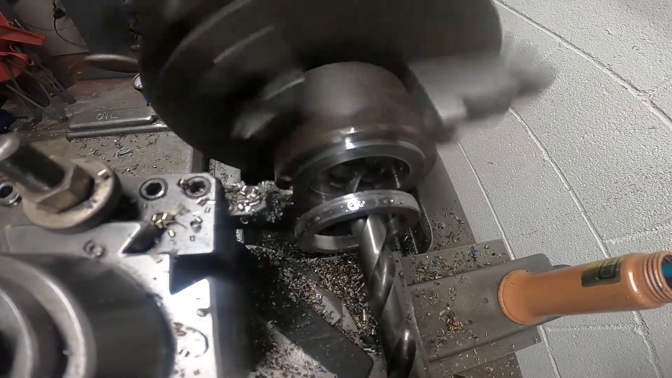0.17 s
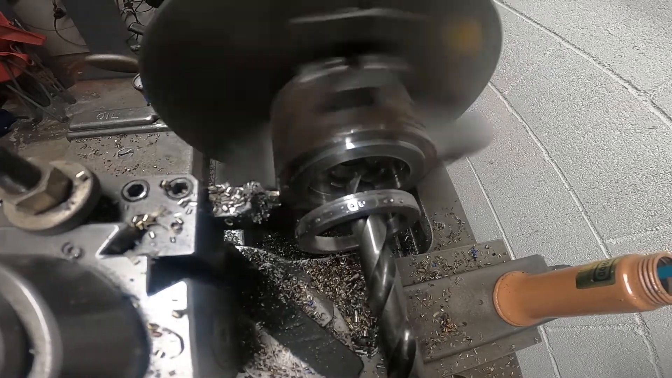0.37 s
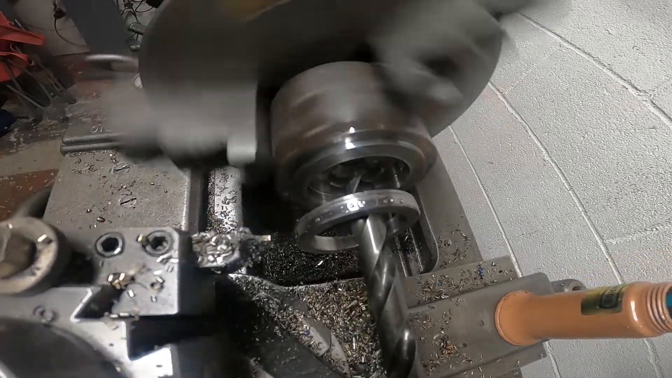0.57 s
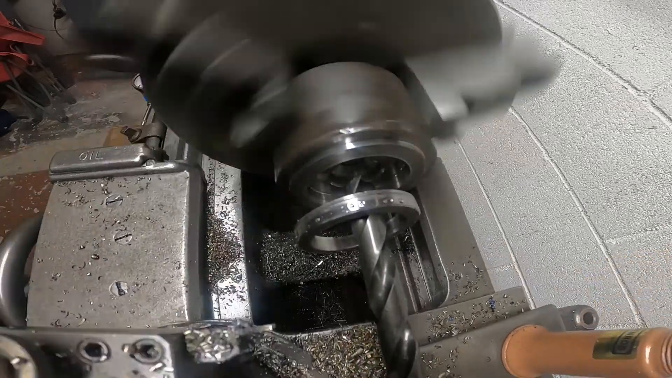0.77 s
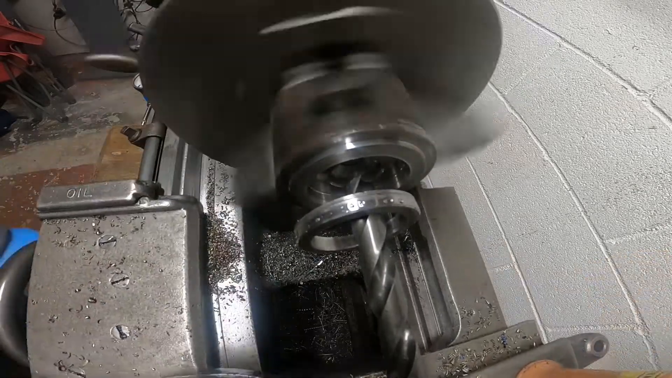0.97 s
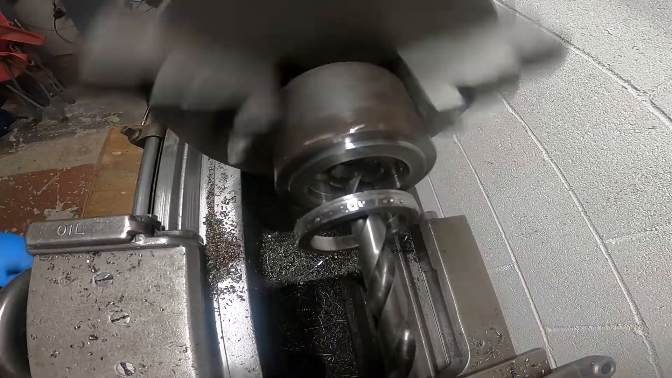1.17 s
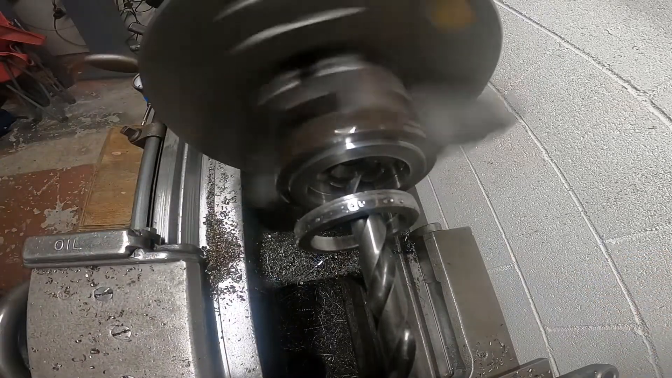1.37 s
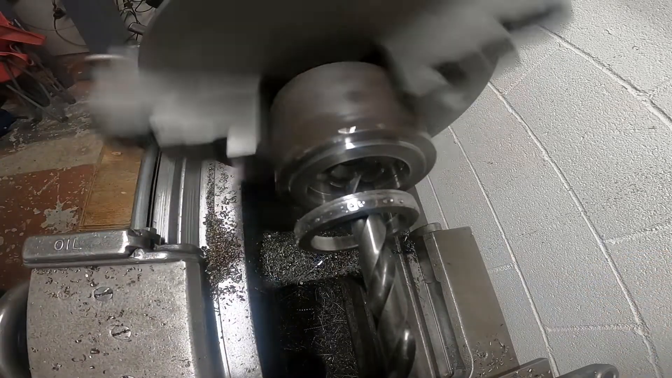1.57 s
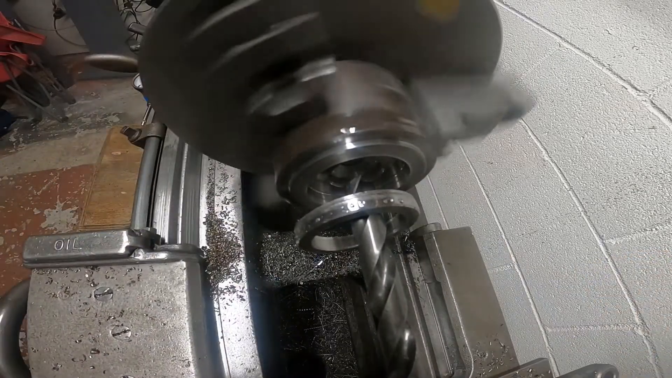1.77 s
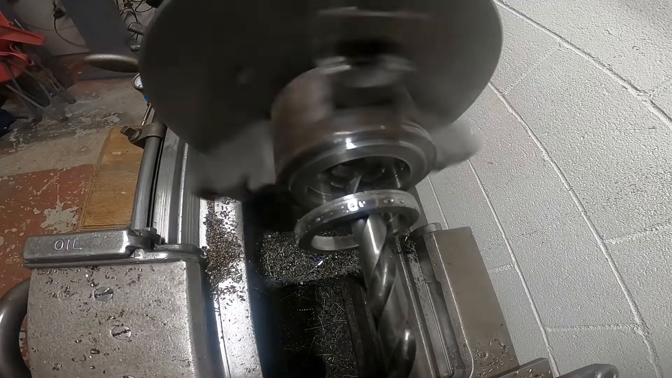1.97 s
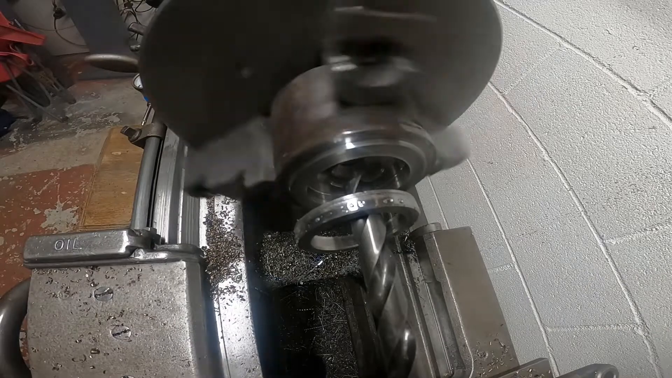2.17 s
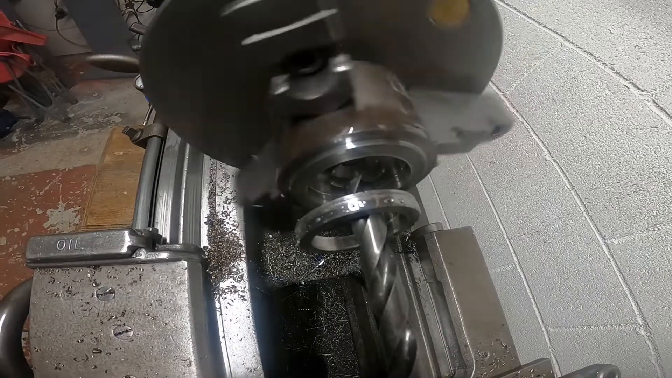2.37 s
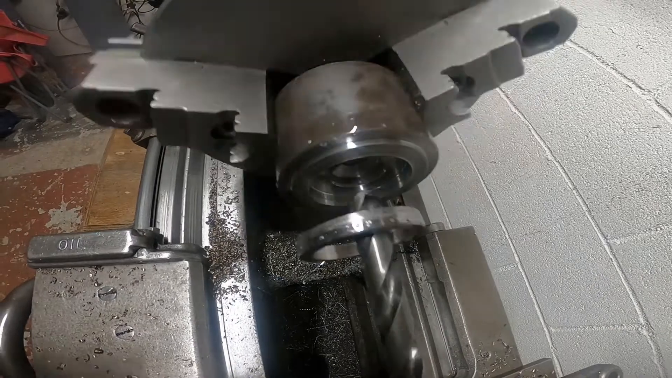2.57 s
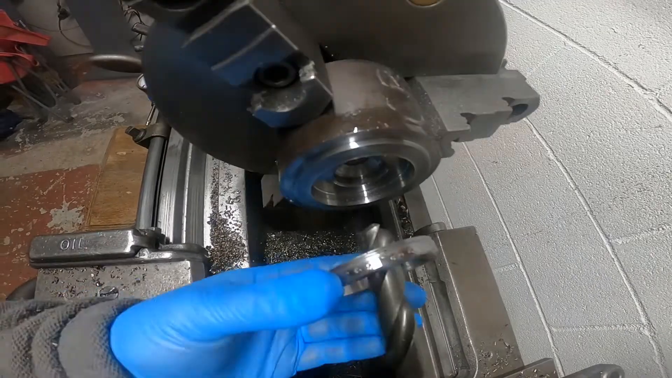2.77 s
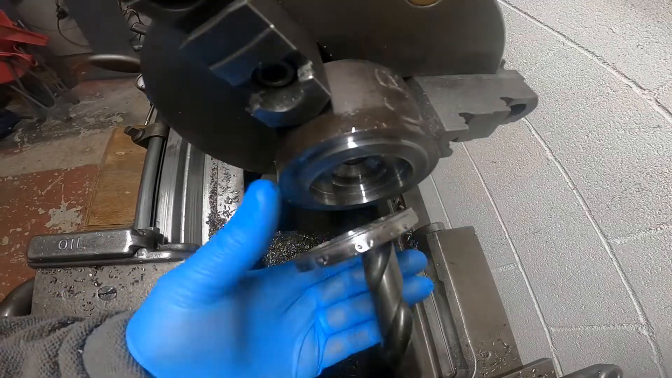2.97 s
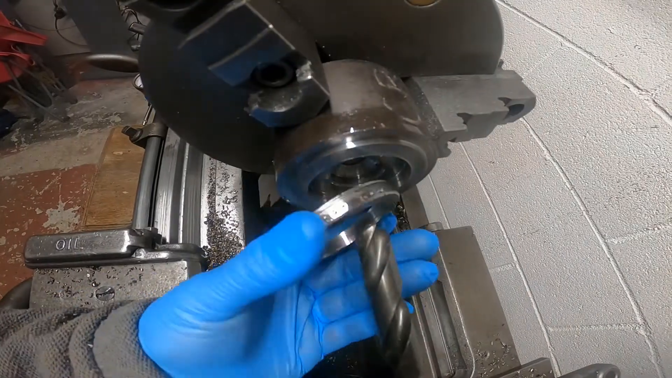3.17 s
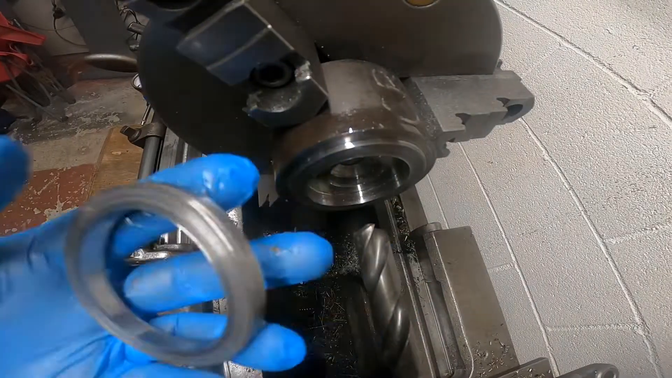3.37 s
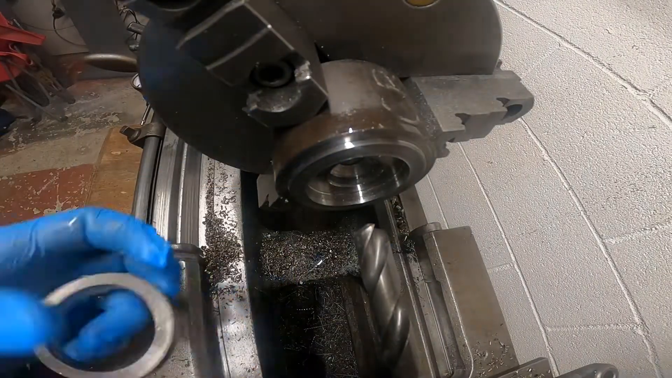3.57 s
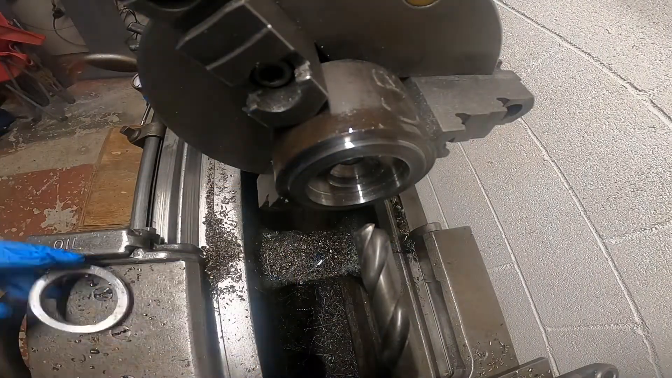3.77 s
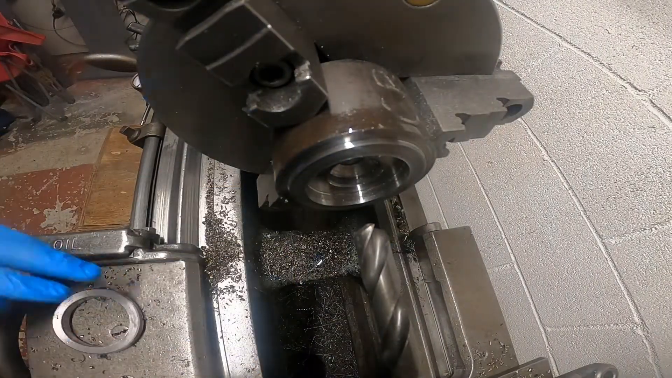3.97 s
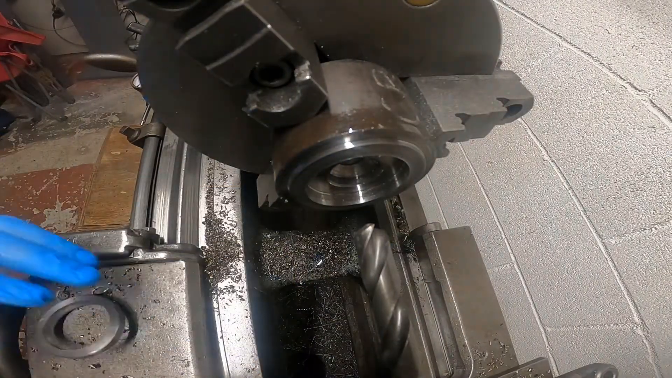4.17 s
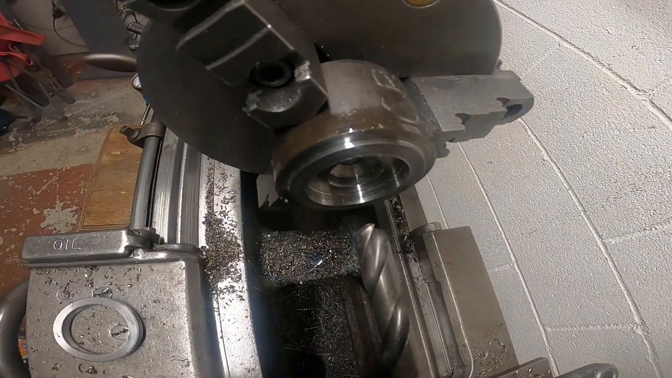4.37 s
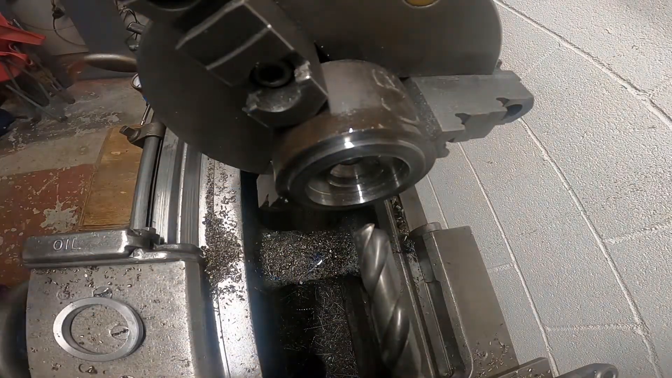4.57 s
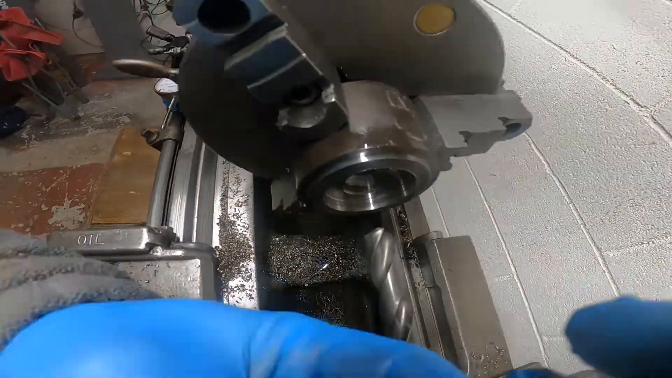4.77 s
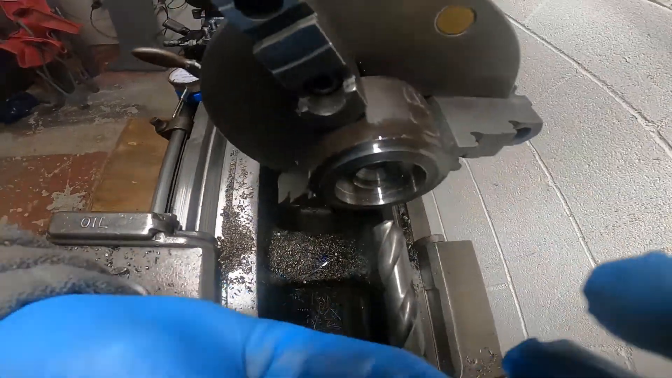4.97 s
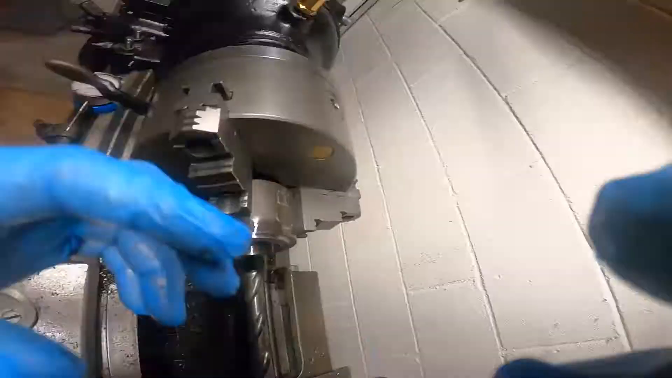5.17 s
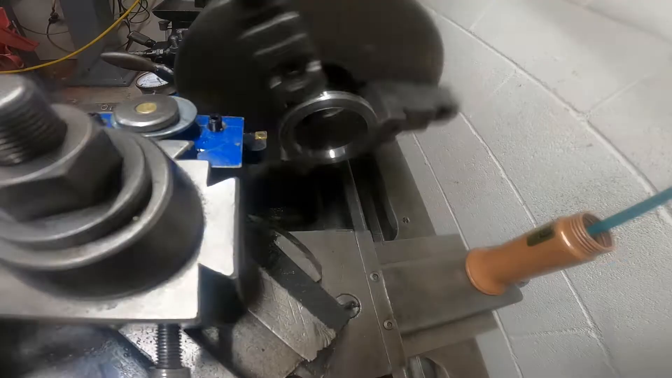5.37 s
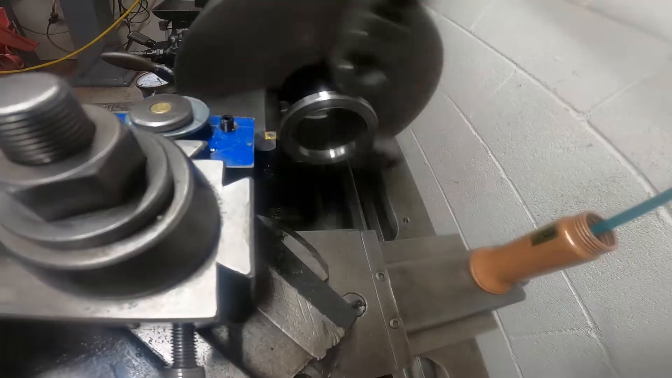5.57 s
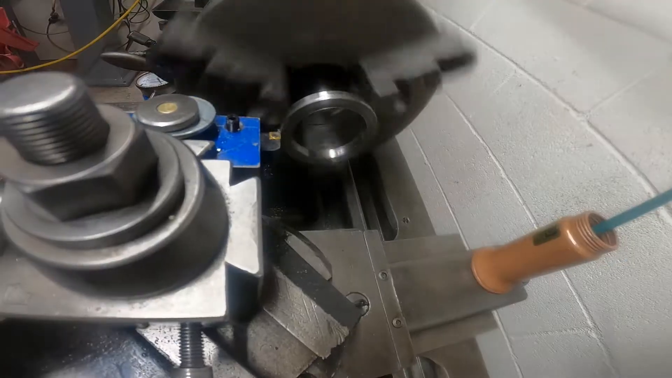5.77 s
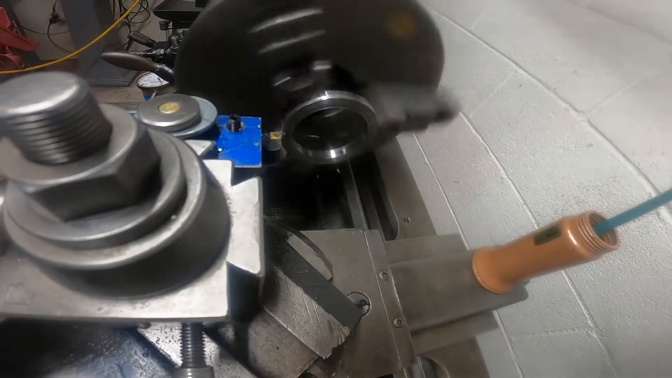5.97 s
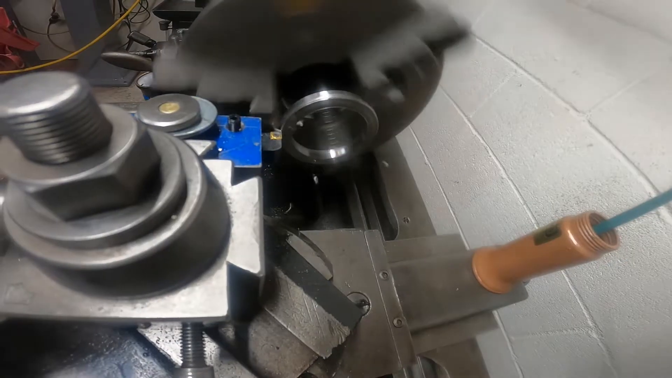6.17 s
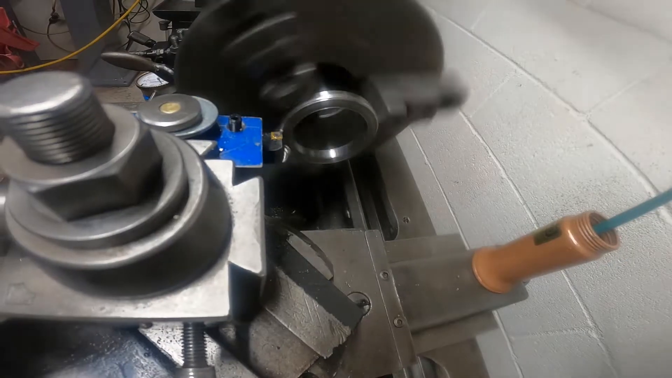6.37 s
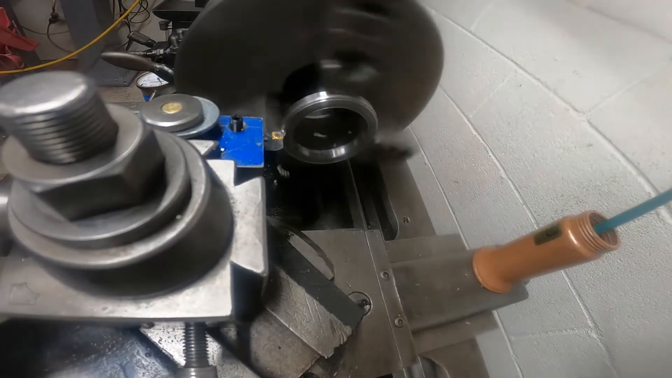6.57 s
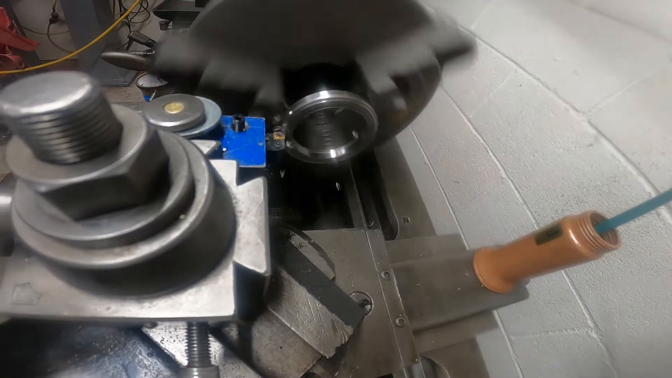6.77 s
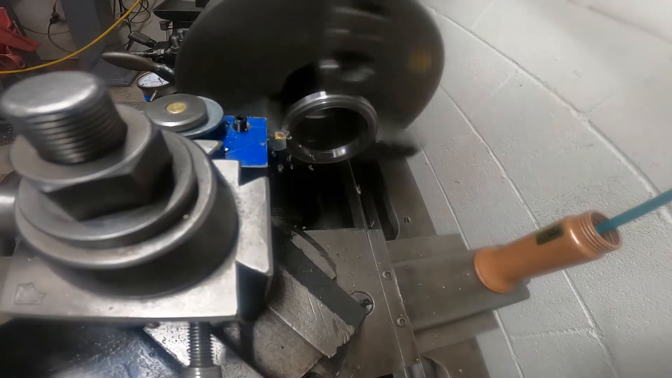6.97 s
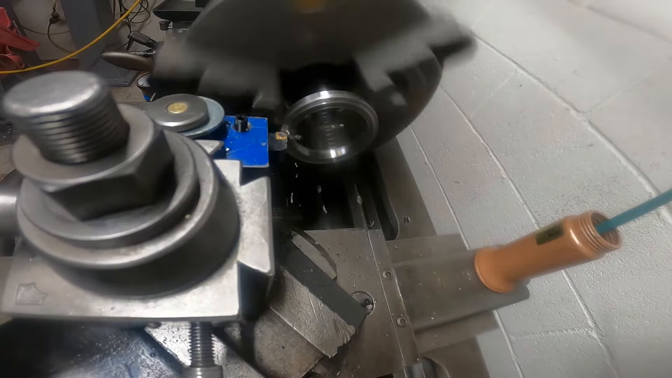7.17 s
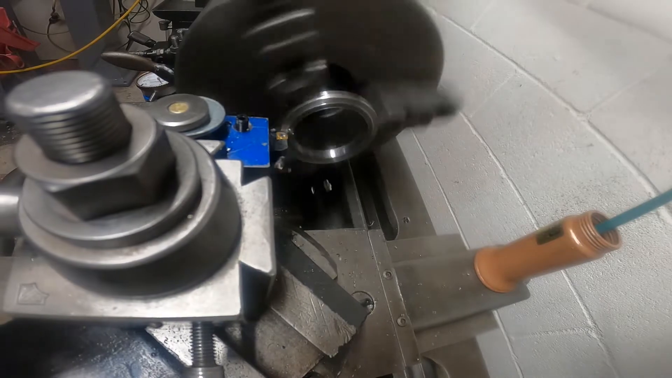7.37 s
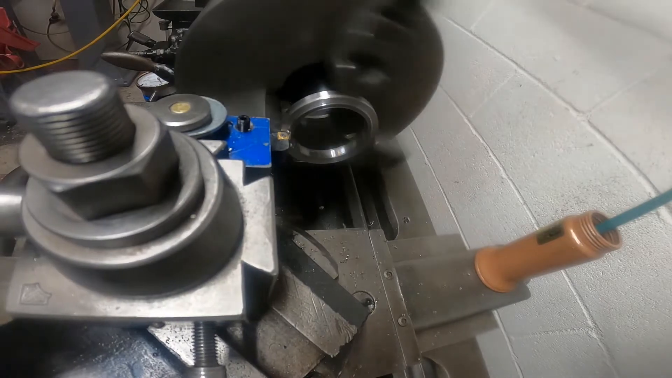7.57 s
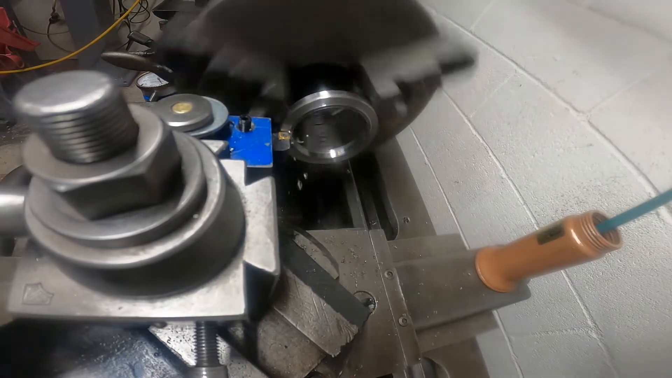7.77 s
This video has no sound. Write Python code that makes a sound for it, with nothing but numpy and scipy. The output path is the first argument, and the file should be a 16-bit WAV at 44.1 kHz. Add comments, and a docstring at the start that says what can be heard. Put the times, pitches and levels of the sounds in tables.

```python
"""A metal lathe stops and starts again

A geared lathe whines, slows and stops; one motor speed sets the pitch and loudness of all its gears.
A gloved hand lifts a cut-off steel ring from the drill and lays it, clinking, on the sliding carriage.
A camera is grabbed and moved, then the lathe speeds up and a tool hisses on the spinning steel.
It is all heard from close by in a small workshop."""
import sys
import numpy as np
from scipy import signal
from scipy.fft import rfft, irfft, next_fast_len
from scipy.io import wavfile
from scipy.ndimage import map_coordinates

SR = 44100
rng = np.random.default_rng(int(sys.argv[2]) if len(sys.argv) > 2 else 0)


def to_wav(sig):
    """Store sig (one row per channel, or 1-D mono) as 16-bit WAV at the path in sys.argv[1].

    Samples outside -1..1 are clipped; the rate is SR.
    """
    pcm = np.clip(np.atleast_2d(sig), -1, 1) * 32767
    pcm = np.round(pcm).astype(np.int16)
    wavfile.write(sys.argv[1], SR, pcm.T)  # frames by channels


N = 344421
T = np.arange(N) / SR

TEETH, FULL_HZ = 29, 1771  # the motor's small gear: its teeth, and tooth hits a second at full speed
BRAKE_S, HALT_S, RESTART_S, CUT_S = 1.425, 2.82, 5.425, 5.72
# how alike left and right sound: (frequency [Hz], likeness [0 to 1])
LIKENESS = [(60, 0.31), (300, 1), (650, 0.97), (1200, 1), (2500, 0.96), (5000, 0.76), (9000, 0.58),
            (15000, 0.52)]


def lathe(whine, full_hz, drone_db, rumble_db, clatter_db, sizzle_db, hum_db, whine_db, throb, slack):
    """Teeth rattle in the iron housing, harder once per motor turn, as shafts hum; all grow with speed."""
    # motor and gear tones at full speed: (pitch [Hz], level [dB])
    gear_hum = [(64, -57), (140, -56), (159, -55.5), (238, -58.5), (317.6, -46.5), (379, -33),
                (397.5, -35.5), (457.6, -44), (478, -39.5), (635.2, -39.5)]
    tooth_hz = tooth_rate()
    speed, motor = tooth_hz / FULL_HZ, cycles(tooth_hz / TEETH)
    beat_db = throb * (np.cos(motor) + 0.33 * np.cos(2 * motor))
    beat = unit(amp(beat_db + 0.44 * wobble(300) + 0.7 * wobble(40)))
    weight = speed ** 2.15
    rumble = amp(rumble_db + 1.1 * wobble(45)) * weight * housing_noise(240, 552)
    drone = amp(drone_db) * weight * speed ** 2 * housing_noise(20, 250)
    clatter = amp(clatter_db) * level_off(speed, knee=slack * 0.48, power=1.28) * housing_noise(603, 2280)
    sizzle = amp(sizzle_db) * level_off(speed, knee=slack * 0.63, power=1.76) * housing_noise(2420, 23000)
    hum = amp(hum_db) * weight * shaft_tones(gear_hum, speed, flutter_db=1, jitter=0.33)
    sing = amp(whine_db) * shaft_tones(whine, tooth_hz / full_hz, flutter_db=3, jitter=0.49)
    return rumble + drone + beat * (clatter + sizzle) + hum + sing


def tooth_rate():
    """Tooth hits a second: full speed, down to rest, up again, then a slight sag under the cut."""
    slowing = FULL_HZ * np.clip((HALT_S - T) / (HALT_S - BRAKE_S), 1e-3, 1) ** 1.05
    rising = 755 + 1412 * (T - RESTART_S)
    loaded = FULL_HZ - 5.8 * np.clip((T - 6.2) / .3, 0, 1)
    return np.where(T < RESTART_S, slowing, np.minimum(rising, loaded))


def housing(hz):
    """How strongly the iron housing gives off each frequency, in dB."""
    # broad shape of the gear noise: (frequency [Hz], level [dB])
    gear_colour = [(30, -30), (60, -17), (100, -21), (220, -11.5), (330, -0.5), (600, 1.2), (1000, -8.5),
                   (2000, 3), (3000, -0.5), (5000, 0.05), (8000, -1.5), (12000, -6.5), (15500, -9)]
    # where the housing rings: (frequency [Hz], width [Hz], boost [dB])
    resonances = [(135, 5, 1), (149.6, 16, 12), (371, 45, 11.5), (389, 13.6, 4.5), (468, 23, 9),
                  (675.5, 23, 8.5), (827, 230, 14), (1082, 113, 9.5), (1230, 193, 14), (1566, 51, 8),
                  (1625, 380, 4), (2156, 65, 5), (2780, 14, 8.5), (3610, 220, 7.5), (4490, 1360, 4),
                  (5450, 380, 3), (6380, 230, 2), (7040, 64, 10), (10691, 360, 2), (12016, 666, 1.5),
                  (12630, 500, 5.5), (14122, 213, 6)]
    return along(gear_colour, hz) + sum(peak(hz, *row) for row in resonances)


def housing_noise(low_hz, high_hz):
    """Noise from the housing between two frequencies."""
    cut_db = lambda hz: 10 * np.log10((1 + (low_hz / (hz + 1)) ** 10) * (1 + (hz / high_hz) ** 10))
    return noise(lambda hz: housing(hz) - cut_db(hz))


def shaft_tones(tones, speed, flutter_db, jitter):
    """Shaft tones glide with the speed, fade as it drops and swell where the housing rings."""
    out, grid_hz = np.zeros((2, N)), np.arange(SR // 2)
    housing_db, angle = housing(grid_hz), cycles(speed)
    for hz, db in tones:
        boost_db = np.interp(hz * speed, grid_hz, housing_db) - housing_db[int(hz)]
        level = amp(db + 0.87 * boost_db + flutter_db * wobble(45)) * speed ** 2
        drift = jitter * (wobble(4) + .5 * wobble(40))
        out += level * stereo_tone(hz * angle + drift + rng.uniform(0, 2 * np.pi), hz)
    return out


def motor_gear(overtones, rough, backlash, glide_db, glide_power, falloff_db):
    """The motor's gear whines; below full speed it sweeps the gearbox's resonances and its teeth bounce."""
    # the whine shifts from odd to even overtones: (time [s], half width [s], size [dB])
    swells = [(1.32, .25, 8.5), (6.3, .3, 6.5)]
    # gearbox resonances: (frequency [Hz], level [dB])
    gearbox = [(500, -7), (950, -8), (1250, 0), (1400, -4), (1640, 6), (1950, 0), (2700, 3), (3100, -1),
               (3600, 0.5), (5400, 2), (6600, 1), (8500, -24.5)]
    tooth_hz = tooth_rate()
    speed, phase, motor = tooth_hz / FULL_HZ, cycles(tooth_hz), cycles(tooth_hz / TEETH)
    gliding = np.clip(11 * (1 - speed), 0, 1)  # 0 at full speed, 1 once clearly slower
    loose = rough + backlash * gliding
    swell_db = sum(db * bump(s, width) for s, width, db in swells)
    out = np.zeros((2, N))
    for k, (full_db, share) in enumerate(overtones, 1):
        slow_db = glide_db + along(gearbox, k * tooth_hz) + glide_power * 20 * np.log10(speed)
        slow_db -= falloff_db * (k - 2.2) ** 2  # favours the overtones near the second
        db = (1 - gliding) * (full_db + share * swell_db) + gliding * slow_db
        sway = (0.11 * k + .55 * gliding) * np.sin(motor + rng.uniform(0, 2 * np.pi))  # once per turn
        shake = loose * (wobble(50) + 0.54 * wobble(200)) + .3 * wobble(4.6)
        out += amp(db + 6.2 * loose * wobble(110)) * stereo_tone(k * phase + sway + shake, k * FULL_HZ)
    return out


def two_runs():
    """The lathe runs until it halts, then starts again with a slightly different whine."""
    # shaft tones of each run at full speed: (pitch [Hz], level [dB])
    first_whine = [(1244, -45.5), (1273, -42), (1523, -40.5), (1588, -44.5), (1712, -43), (2374, -46.5),
                   (3128, -42.5), (3295, -49), (3666, -40), (3908, -44), (4393, -43), (4689, -41.5),
                   (5405, -45.5), (5491, -48.5), (8280, -57), (8856, -54)]
    second_whine = [(877.5, -45.5), (1523, -43.5), (1701, -50), (2126, -49), (3117, -46), (3957, -49.5),
                    (4377, -39), (5173, -50), (5356, -40), (5475, -45), (8834, -61.5)]
    # motor gear at 1 to 6 times the tooth rate: (first run [dB], second run [dB], swell share [factor])
    overtones = [(-31.5, -39, -.3), (-34, -38, 1), (-31, -24.5, -0.43), (-45.5, -34, .6), (-64, -57, 0),
                 (-75, -69, 0)]
    first_db, second_db, share = np.transpose(overtones)
    first = lathe(first_whine, full_hz=1771, drone_db=-47.5, rumble_db=-32.5, clatter_db=-29.5,
                  sizzle_db=-24, hum_db=2, whine_db=4.5, throb=0.89, slack=1.08)
    first += motor_gear(zip(first_db, share), rough=.15, backlash=.42,
                        glide_db=-29.6, glide_power=1.6, falloff_db=.6)
    second = lathe(second_whine, full_hz=1766, drone_db=-49, rumble_db=-32, clatter_db=-29.5,
                   sizzle_db=-26, hum_db=2, whine_db=4, throb=0.53, slack=0.74)
    second += motor_gear(zip(second_db, share), rough=.24, backlash=.6,
                         glide_db=-31.3, glide_power=.55, falloff_db=.7)
    return first * (T < HALT_S) + second * np.clip((T - RESTART_S) / 0.037, 0, 1) ** 2


def cutting():
    """Steel tears off in a hiss that swells as each of the three jaws gripping it comes round."""
    # the hiss: (frequency [Hz], level [dB])
    hiss_colour = [(3000, -26), (6000, -7), (7900, -3), (9500, -2), (10700, 3), (13000, -1.5),
                   (15700, -3.5)]
    tooth_hz, hits_per_turn = tooth_rate(), 254
    jaws, motor = 3 * cycles(tooth_hz / hits_per_turn), cycles(tooth_hz / TEETH)
    swell_db = 1.1 * np.cos(jaws) + 1.3 * np.cos(motor) + 1.5 * wobble(900)
    return cut_gain() * unit(amp(swell_db)) * noise(lambda hz: along(hiss_colour, hz))


def cut_gain():
    """The tool bites, then the cut deepens to a steady strength."""
    shallow_db = 7 * np.exp(-np.maximum(T - CUT_S, 0) / 0.45)
    bite_db = 6.5 * bump(5.82, width_s=0.032)
    return np.clip((T - CUT_S) / 0.15, 0, 1) * amp(-23.5 - shallow_db + bite_db)


def chips():
    """Now and then a chip curls off the tool with a brief high chirp."""
    out, t = np.zeros((2, N)), np.arange(SR // 50) / SR
    for when, pitch, size in rng.random((45, 3)):
        s, hz = CUT_S + (T[-1] - CUT_S) * when, 7200 + 6000 * pitch ** 2
        chirp = np.sin(2 * np.pi * hz * t * (1 - t) + rng.normal(0, .5, len(t))) * np.hanning(len(t))
        add(out, s, amp(9 * size - 13) * chirp)
    return cut_gain() * out


def steel_ring():
    """The ring clinks against drill and carriage; the glove damps it quickly."""
    # (time [s], level [dB], fade time [s], brightness [dB per octave], left minus right [dB])
    clinks = [(2.502, -16.5, .05, -6, 1), (2.984, -25.5, 0.045, -.5, 2), (3.139, -15.5, 0.021, 7, 1),
              (3.529, -29, .08, 5, 6), (3.652, -33, .012, 5, 2), (3.677, -22.5, 0.024, -2.5, 1),
              (3.682, -16, 0.065, -1.5, 1.5), (3.791, -7, 0.02, 3, 0), (3.803, -21, 0.038, -0.5, 1),
              (3.82, -27, .05, 0, 2), (3.879, -36, .06, -3.5, 0), (4.021, -33.5, .04, 3.5, 5),
              (4.21, -29, 0.037, 0, 0), (4.218, -18, 0.028, 1.5, 0), (4.253, -30.5, .04, -2, 0),
              (4.272, -24.5, .05, 0, 1.5), (4.529, -26, 0.091, 1, 4), (4.62, -29, 0.076, -1.5, 3.5)]
    # the ring's own notes: (pitch [Hz], level [dB], fade time [s])
    steel_notes = [(804, -7.5, 0.22), (1155, -11, 0.099), (2615, -10, 0.13), (3750, -20, 0.063),
                   (4730, -3, 0.18), (5600, -5, 0.14), (6800, -14, 0.055), (8300, -13, 0.045),
                   (9980, -12, 0.045), (11070, 2, 0.093), (13100, -10, 0.036)]
    # the crack of contact: (frequency [Hz], level [dB])
    crack_colour = [(100, -19), (400, -32), (800, -6), (1600, -19.5), (2700, -6), (4800, -0.5), (12000, -2),
                    (16000, -2)]
    out, t = np.zeros((2, N)), np.arange(SR // 4) / SR
    for s, db, fade_s, slope, pan in clinks:
        fade = amp(-60 * t / fade_s) + 0.64 * amp(-60 * t / 0.0041)
        crack = noise(tilted(crack_colour, slope), size=len(t)) * fade
        # a harder contact rings brighter
        notes = [(hz, level + .5 * slope * np.log2(hz / 8000), t60) for hz, level, t60 in steel_notes]
        add(out, s, amp(db - 11) * (crack + 0.09 * ringing(notes, t)), pan)
    return out


def camera():
    """Fingers knock a camera's body, its mount snaps, and the grip rumbles, mostly on the left."""
    # (time [s], thump [dB], snap [dB], brightness [dB per octave], thump left minus right [dB])
    knocks = [(4.738, -26, -54, -4, 10), (4.752, -36, -51, -4, 20), (4.803, -22, -37, -5, 3),
              (4.873, -23, -32.5, -4, 3), (4.889, -22.5, -38, -4, -2), (4.936, -13.5, -8.5, .5, 5),
              (4.955, -25, -48, -4, -2), (4.991, -22, -26, -3, -3), (5.066, -25, -47, -5, 2),
              (5.079, -10, -10, -2.5, 5.5), (5.139, -19, -32, -3, 6), (5.17, -15, -7.5, -3, 2),
              (5.278, -23.5, -49, -9, -7)]
    # the body's own notes: (pitch [Hz], level [dB], fade time [s])
    body_notes = [(118, -26, 0.12), (188, -1, 0.053), (308, 4.5, 0.023), (587, -5, 0.023),
                  (1160, -8, 0.013), (3380, -22, 0.019)]
    # the mount's snap and the grip's rumble: (frequency [Hz], level [dB])
    snap_colour = [(100, -7), (600, -1.5), (1200, -8.5), (1900, -11.5), (3000, -7), (7000, -12.5),
                   (15000, -14)]
    grip_colour = [(20, -22), (35, -9), (55, 1), (130, 1.5), (200, -2), (500, -19), (1500, -27),
                   (6000, -63)]
    out, t = np.zeros((2, N)), np.arange(SR // 5) / SR
    snap_shape = amp(-60 * t / 0.014) * (1 - np.exp(-t / 0.00051))
    for s, thump_db, snap_db, slope, pan in knocks:
        snap = noise(tilted(snap_colour, slope), size=len(t)) * snap_shape
        left = ringing(body_notes, t)  # each side is shaken its own way
        right = ringing(body_notes, t) * (1 - np.exp(-t / 0.0016))
        add(out, s, amp(thump_db - 5.5) * np.array([left, right]), pan)
        add(out, s, amp(snap_db) * snap)
    rumble = filtered(rng.standard_normal((2, N)), lambda hz: amp(along(grip_colour, hz)))
    grip_s = 4.71
    settling = amp(-34.5 - 23 * np.maximum(T - grip_s, 0))
    grip = settling * held(grip_s, rise_s=.17, end_s=5.39, fade_db_per_s=700)
    return out + grip * unit(rumble + .4 * rumble[0]) * amp([[2], [-7]])


def glove():
    """Rubber sticks and slips over gritty metal and the camera's shell."""
    # (time [s], length [s], level [dB], brightness [dB per octave])
    rubs = [(2.643, 0.032, -39, -4), (2.82, 0.15, -52, -3), (3.194, .031, -42, 0.5),
            (3.389, 0.26, -50, -0.5), (3.522, .038, -27.5, 13), (3.684, 0.12, -57, -1.5),
            (3.798, 0.085, -50, 2.5), (3.963, 0.19, -55.5, 0.5), (4.198, 0.045, -37.5, 2.5),
            (4.226, 0.11, -49, -0.5), (4.327, 0.19, -50.5, 3), (4.539, 0.39, -49, 0.5),
            (4.681, 0.037, -32, 2), (4.727, 0.045, -30, -29), (4.729, 0.072, -49, 1),
            (4.792, .038, -40.5, -10), (4.827, 0.26, -57, 0), (4.91, .02, -46.5, -7),
            (5.101, .059, -37, -8.5), (5.151, 0.037, -31, -3), (5.168, .075, -48.5, 0),
            (5.241, 0.027, -38.5, 5.5), (5.245, 0.16, -48.5, -3), (5.295, 0.06, -39.5, -3.5),
            (5.365, 0.043, -29.5, -8.5)]
    # rubbing rubber: (frequency [Hz], level [dB])
    rub_colour = [(150, -22), (475, -7.5), (850, -5.5), (1600, -8.5), (2600, -10.5), (3400, -9),
                  (5100, -5.5), (6500, -8), (9000, -6.5), (13000, -6.5), (16000, -6.5)]
    out, grit = np.zeros((2, N)), unit(amp(2.5 * wobble(550)))
    for s, length, db, slope in rubs:
        shape = stroke(length)
        add(out, s, amp(db) * shape * noise(tilted(rub_colour, slope), size=len(shape)))
    return out * grit * amp([[.7], [-.7]])


def scrape():
    """The ring squeals as friction drags it over drill and carriage."""
    # (time [s], length [s], level [dB], pitch [factor])
    drags = [(2.839, .06, -49.5, .82), (3.192, 0.029, -45.5, 0.8), (4.038, .08, -57, 1),
             (4.11, 0.11, -66.5, 0.97), (4.328, .16, -63, 1.06)]
    # resonances of the sliding steel: (frequency [Hz], width [Hz], level [dB])
    squeal = [(2500, 160, -2), (5070, 310, 0)]
    out = np.zeros((2, N))
    for s, length, db, pitch in drags:
        shape = stroke(length)
        add(out, s, amp(db) * shape * noise(lambda hz: resonant(squeal, hz / pitch), size=len(shape)))
    return out * amp(1.5 * wobble(200))


def chatter():
    """While the lathe slows, loose teeth knock at random and make the gears ring."""
    knocks_per_s, t = 140, np.arange(SR // 10) / SR
    knocks = (rng.random(N) < knocks_per_s / SR) * amp(4.4 * rng.standard_normal(N))
    bell = ringing([(1232, -2, 0.15), (1316, -0.5, 0.15), (1170, -22.5, 0.072)], t)
    rattle = unit(signal.fftconvolve(knocks, np.diff(bell, prepend=0))[:N])
    slowing = held(1.53, rise_s=0.14, end_s=2.36, fade_db_per_s=90) * (tooth_rate() / FULL_HZ) ** .45
    return amp(-29) * slowing * rattle


def halting():
    """In its last turns the motor growls; the gears judder and take up their slack with a clunk."""
    turn = 2 * np.pi * 49 * T + 0.27 * wobble(8.1)
    growl = np.sin(turn) + 0.17 * np.sin(3 * turn + wobble(12)) + 0.11 * np.sin(4 * turn + wobble(12))
    growl *= amp(-47.5) * held(2.35, rise_s=.22, end_s=2.76, fade_db_per_s=100)
    judder = amp(-41) * held(2.2, rise_s=.33, end_s=2.725, fade_db_per_s=260) * housing_noise(150, 620)
    clunk = amp(-30) * held(2.645, rise_s=.006, end_s=2.662, fade_db_per_s=600) * housing_noise(350, 2020)
    return growl + judder + clunk


def motor_drive():
    """The motor's power unit whistles at standstill, then winds down, over a faint steady tone."""
    # the whistle's tones: (multiple of its pitch [factor], level [dB])
    whistle_tones = [(1.22, -11), (2, -6), (2.5, -9), (2.705, -12), (3.393, -12), (4, -1.5), (5, -2),
                     (6, -11), (7, -8)]
    # the unit's fan: (frequency [Hz], width [Hz], level [dB])
    fan_peaks = [(777, 160, -0.5), (1600, 81, 5), (2640, 350, -0.5), (4060, 320, -18), (5100, 300, -7),
                 (7000, 6500, -6)]
    off_s = 3.31
    pitch_hz = 1480.5 * np.exp(-2.05 * np.maximum(T - off_s, 0))
    phase, whistle = cycles(pitch_hz), np.zeros(N)
    for k, db in whistle_tones:
        boost_db = peak(k * pitch_hz, centre_hz=1630, width_hz=130, db=20)  # falling tones pass through it
        whistle += amp(db + boost_db + 3.4 * wobble(40)) * np.sin(k * phase + 0.26 * wobble(60))
    fan = noise(lambda hz: resonant(fan_peaks, hz))
    running = amp(-61) * held(2.1, rise_s=0.58, end_s=off_s, fade_db_per_s=75)
    return running * (amp(4.5) * whistle + amp(9.5) * fan) + amp(-72.5) * np.sin(2 * np.pi * 479 * T)


def carriage():
    """The carriage is wound back, rumbling along the lathe's bed, then slows."""
    # resonances of the bed, made sharper below: (frequency [Hz], width [Hz], level [dB])
    bed_peaks = [(59, 22, -0.5), (150, 40, -11.5)]
    roll = amp(-49.5) * held(-.1, rise_s=.1, end_s=0.51, fade_db_per_s=9)
    roll *= amp(-40 * np.maximum(T - BRAKE_S, 0))
    return roll * noise(lambda hz: 2 * resonant(bed_peaks, hz))


def wall_echo(x):
    """The workshop's block walls answer with a short echo."""
    # (frequency [Hz], time to fade by 60 dB [s])
    fade_times = [(200, 0.29), (2000, 0.42), (12000, 0.06)]
    hz, t, spectrum = signal.stft(rng.standard_normal((2, SR // 2)), SR, nperseg=256)
    tail = signal.istft(spectrum * amp(-60 * t / along(fade_times, hz)[:, None]), SR, nperseg=256)[1]
    return signal.fftconvolve(x, tail / np.linalg.norm(tail[0]), axes=1)[:, :N]


def room_air():
    """A faint, steady hush fills the room."""
    # (frequency [Hz], level [dB])
    air_colour = [(25, -12), (120, -0.5), (250, -5), (800, -1.5), (1600, -11), (5000, -19), (16000, -23)]
    return amp(-71.5) * noise(lambda hz: along(air_colour, hz))


def amp(db):
    """Turn decibels into a gain."""
    return 10 ** (np.asarray(db) / 20)


def unit(x):
    """Scale to an average power of 1."""
    return x / np.sqrt(np.mean(x ** 2) + 1e-20)


def along(points, hz):
    """Read between (frequency, value) points, spaced by octaves."""
    frequencies, values = np.transpose(points)
    return np.interp(np.log(hz + 1), np.log(frequencies + 1), values)


def tilted(points, slope):
    """A colour (dB at each frequency) made brighter or duller by slope dB per octave."""
    return lambda hz: along(points, hz) + slope * np.log2(1 + hz / 500)


def peak(hz, centre_hz, width_hz, db):
    """The boost in dB near one resonance."""
    return db / (1 + (2 * (hz - centre_hz) / width_hz) ** 2)


def resonant(peaks, hz):
    """The colour in dB of a few resonances together."""
    gain = sum(amp(db) * hz * width / np.hypot(centre ** 2 - hz ** 2, hz * width)
               for centre, width, db in peaks)
    return 20 * np.log10(gain + 1e-6)


def filtered(x, response):
    """Scale each frequency of x by response(hz)."""
    n = x.shape[-1]
    padded = next_fast_len(n + SR // 10)
    return irfft(rfft(x, padded) * response(np.fft.rfftfreq(padded, 1 / SR)), padded)[..., :n]


def spread(hz):
    """An angle that grows as left and right become less alike."""
    return np.arccos(np.clip(along(LIKENESS, hz), -1, 1)) / 2


def noise(colour, size=N):
    """Stereo noise with a colour in dB; the sides differ most in deep bass and treble."""
    response = lambda hz: amp(colour(hz)) * [np.cos(spread(hz)), np.sin(spread(hz))]
    mid, side = filtered(rng.standard_normal((2, size)), response)
    return unit(np.array([mid + side, mid - side]))


def stereo_tone(phase, hz):
    """A tone that reaches left and right slightly out of step."""
    shift = spread(hz) * rng.choice([-1, 1])
    return np.sin([phase + shift, phase - shift])


def ringing(notes, t):
    """A struck object's notes, a little different each time; each fades by 60 dB in t60 seconds."""
    return sum(amp(db + rng.normal(0, 3.3) - 60 * t / t60)
               * np.sin(2 * np.pi * hz * rng.normal(1, 0.0079) * t) for hz, db, t60 in notes)


def wobble(rate):
    """A smooth random curve through rate points a second."""
    return map_coordinates(rng.standard_normal(int(N * rate / SR) + 4), [T * rate])


def cycles(hz):
    """The running angle (phase) of a changing frequency."""
    return 2 * np.pi * np.cumsum(hz) / SR


def held(start_s, rise_s, end_s, fade_db_per_s):
    """A level that rises, holds until end_s, then fades."""
    return np.clip((T - start_s) / rise_s, 0, 1) * amp(-fade_db_per_s * np.maximum(T - end_s, 0))


def bump(s, width_s):
    """A bell-shaped swell of height 1 around time s."""
    return np.exp(-((T - s) / width_s) ** 2)


def stroke(length_s):
    """The rounded rise and fall of one sliding movement."""
    return np.sqrt(np.hanning(int(length_s * SR)))


def level_off(speed, knee, power):
    """A gain that grows with speed, flattens above the knee and is 1 at full speed."""
    return np.sqrt((1 + knee ** (2 * power)) / (1 + (knee / speed) ** (2 * power)))


def add(out, s, sound, pan_db=0):
    """Mix a sound in at time s, pan_db louder on the left."""
    part = out[:, round(s * SR):][:, :sound.shape[-1]]
    part += (sound * amp([[pan_db / 2], [-pan_db / 2]]))[:, :part.shape[1]]


def scene():
    """Two runs of the lathe with the handling between them; only the handling echoes."""
    runs = two_runs()
    handling = steel_ring() + glove() + scrape() + camera()
    machine = runs + carriage() + chatter() + halting() + cutting() + chips() + motor_drive()
    return machine * amp([[.15], [-.15]]) + handling + amp(-23.5) * wall_echo(handling) + room_air()


def record(dry):
    """The very highest treble is cut off."""
    top_hz, edge_hz = 15780, 300
    return filtered(dry, lambda hz: np.clip((top_hz - hz) / edge_hz + .5, 0, 1))


dry = scene()
out = record(dry)
to_wav(out)
```